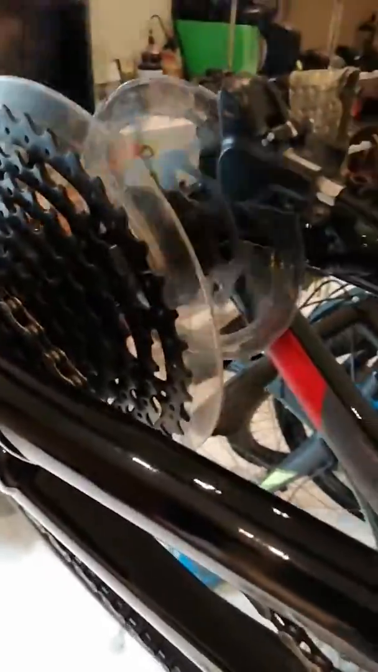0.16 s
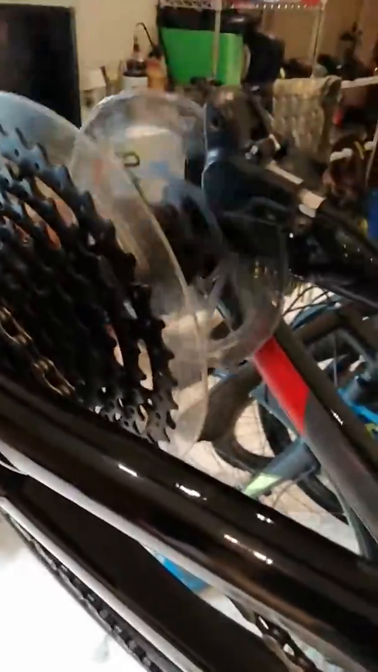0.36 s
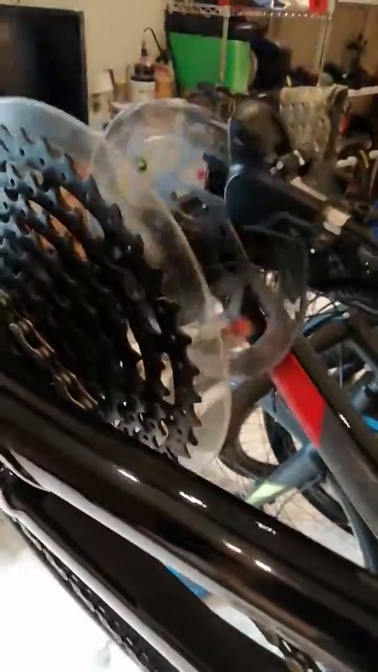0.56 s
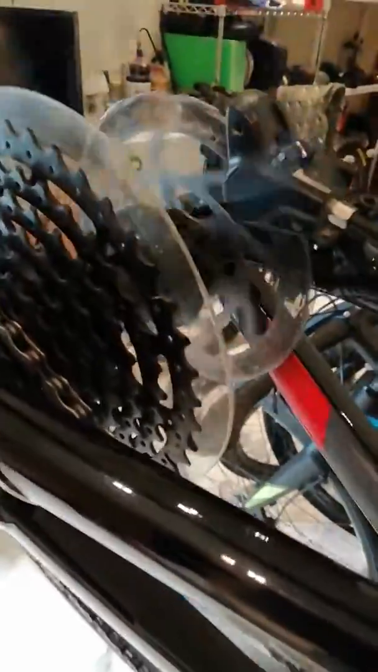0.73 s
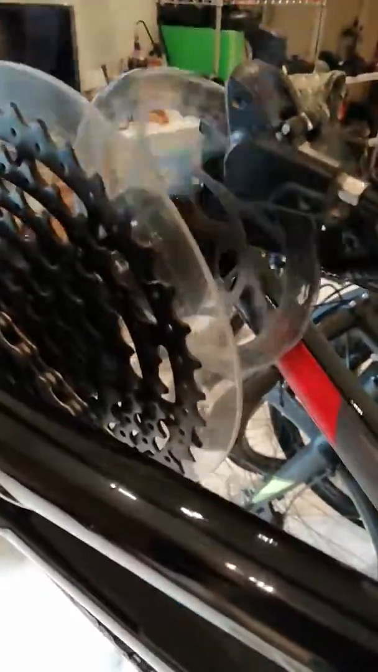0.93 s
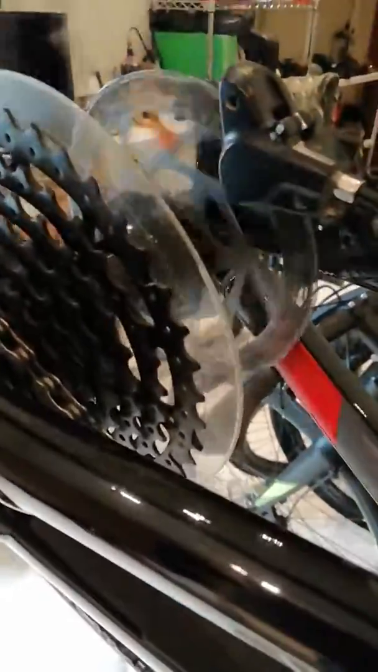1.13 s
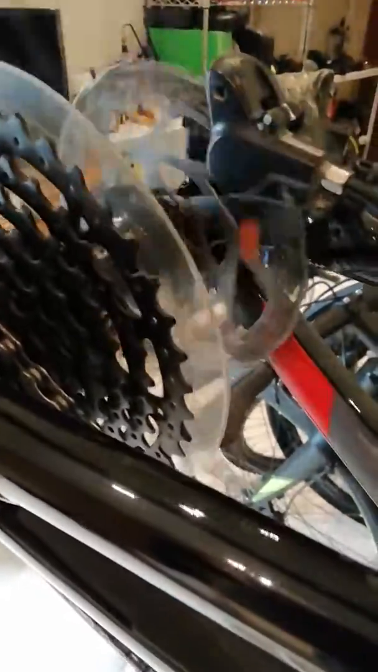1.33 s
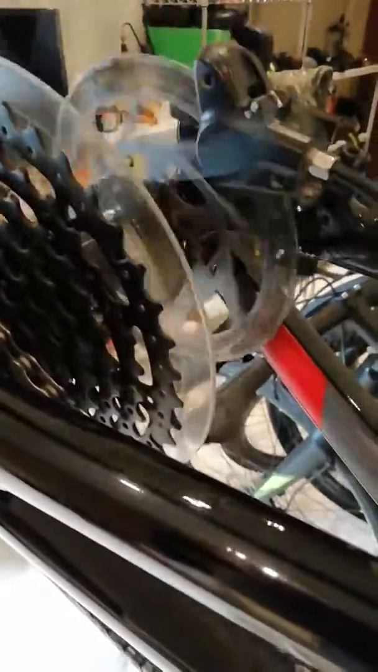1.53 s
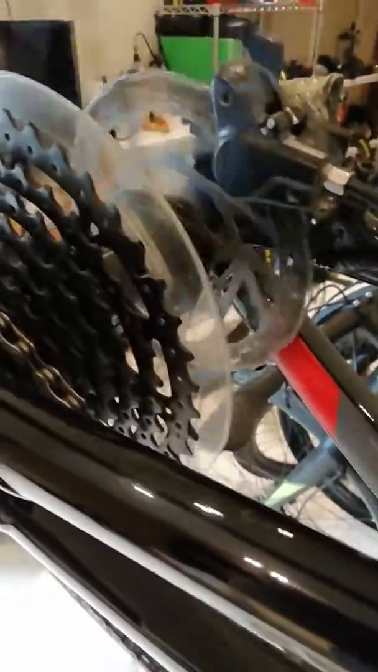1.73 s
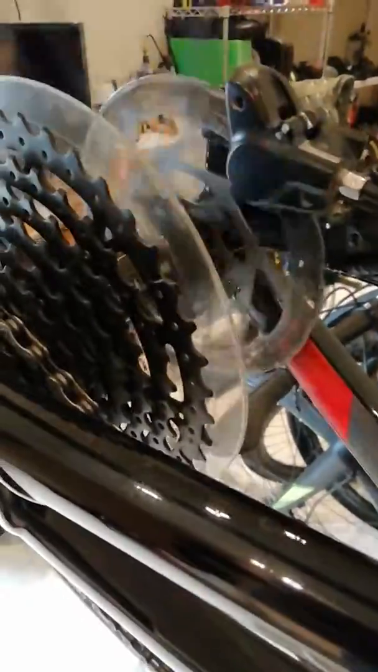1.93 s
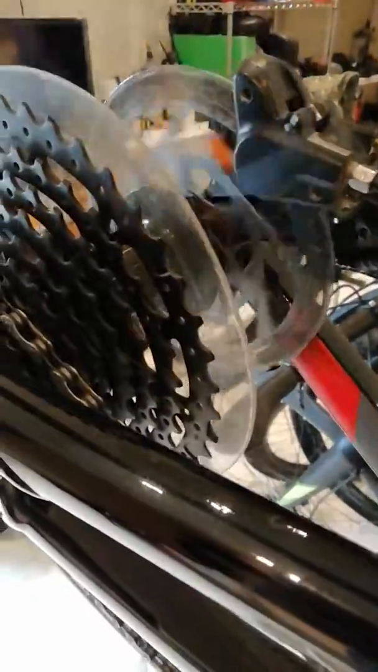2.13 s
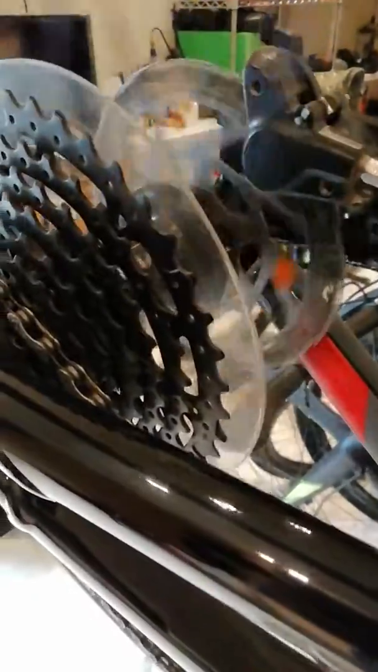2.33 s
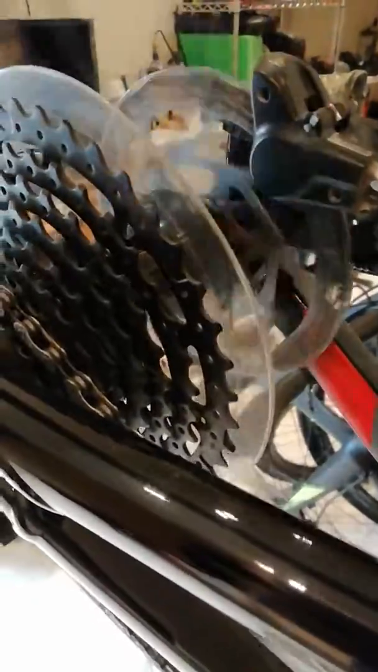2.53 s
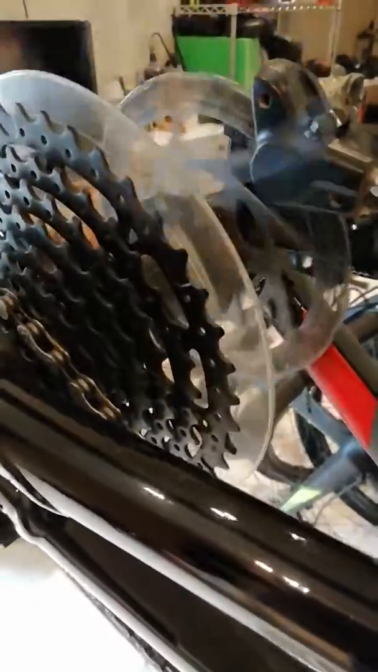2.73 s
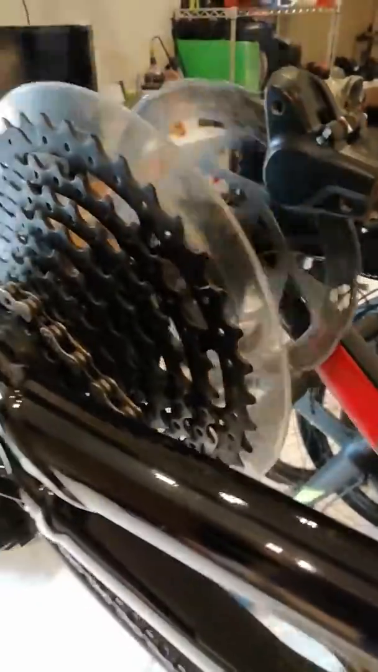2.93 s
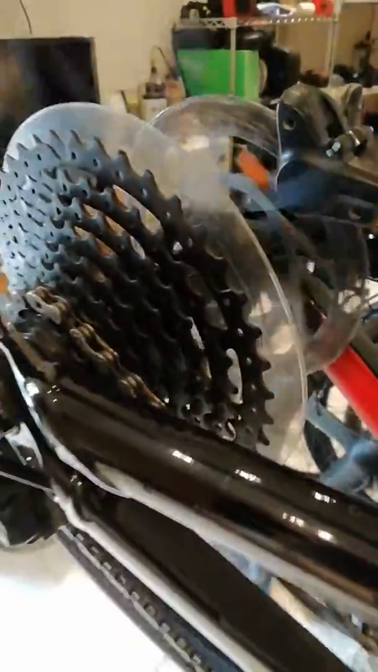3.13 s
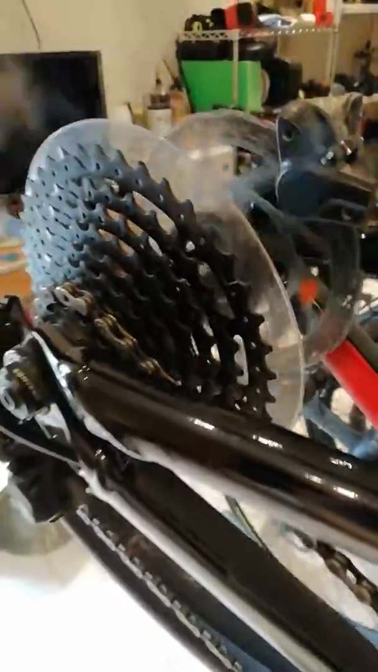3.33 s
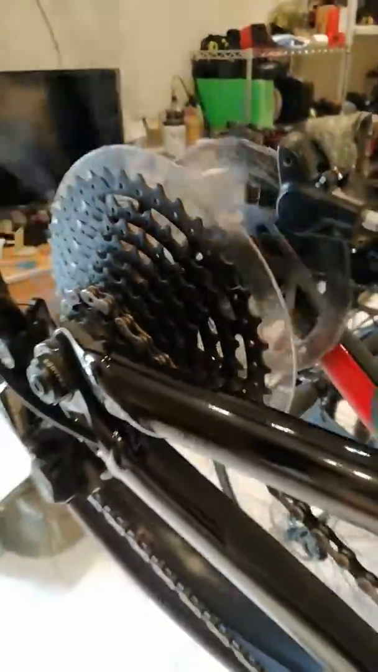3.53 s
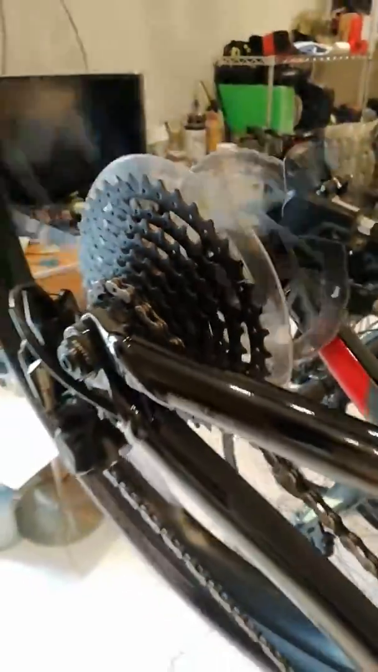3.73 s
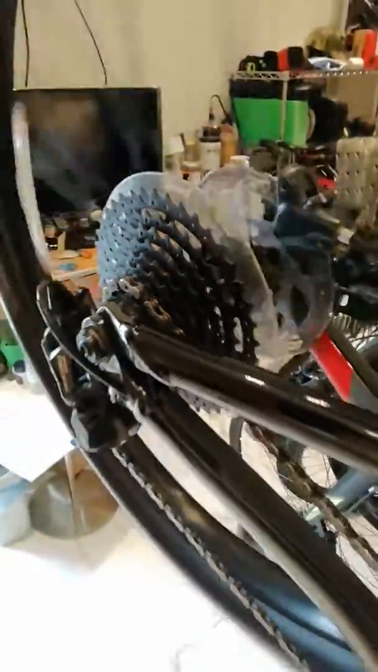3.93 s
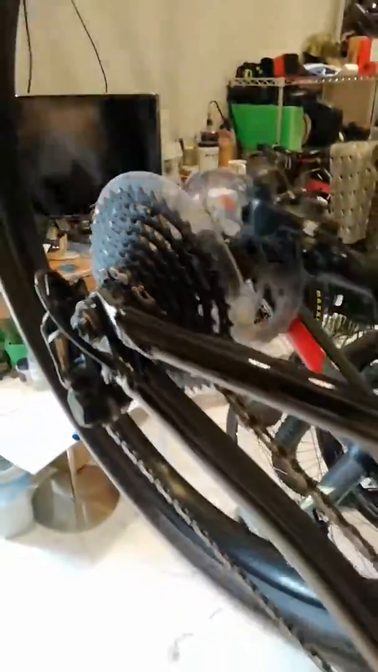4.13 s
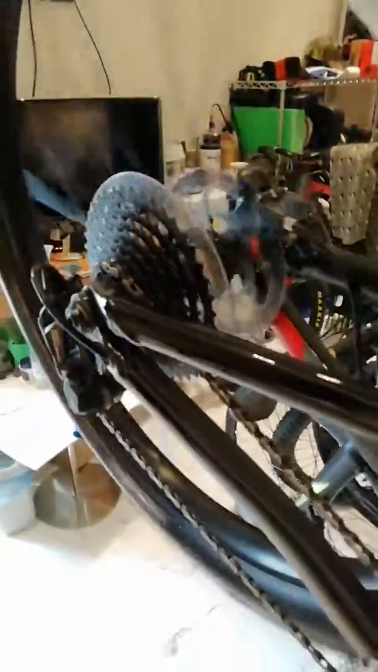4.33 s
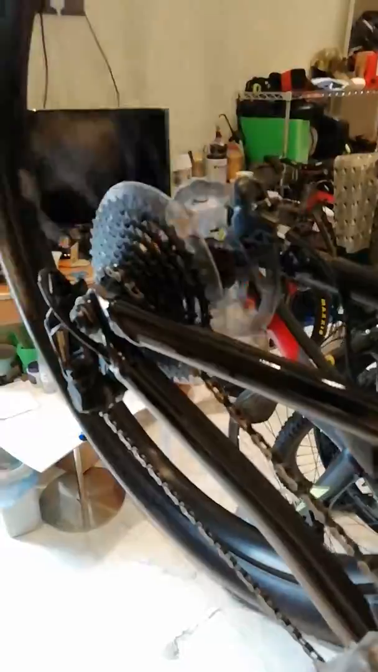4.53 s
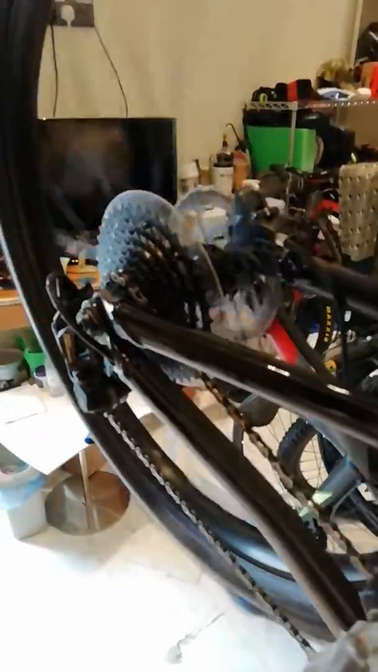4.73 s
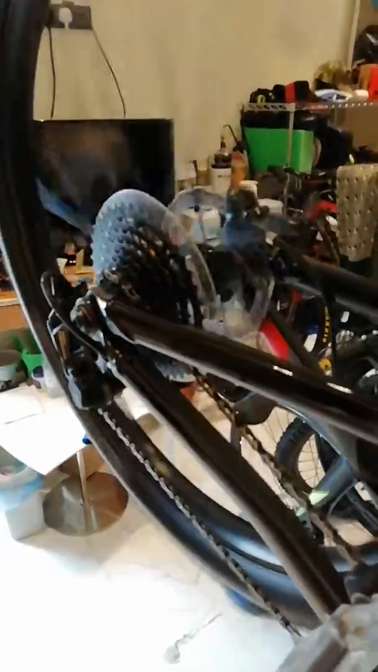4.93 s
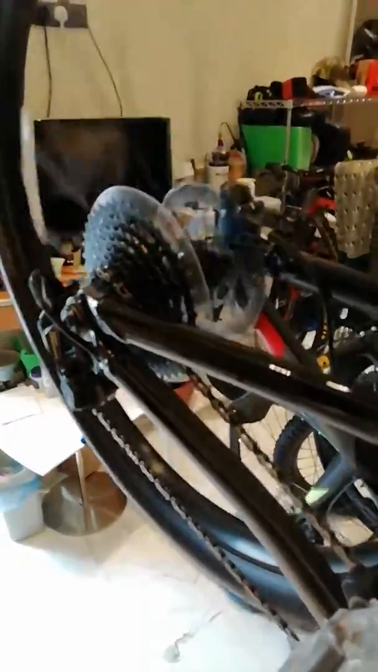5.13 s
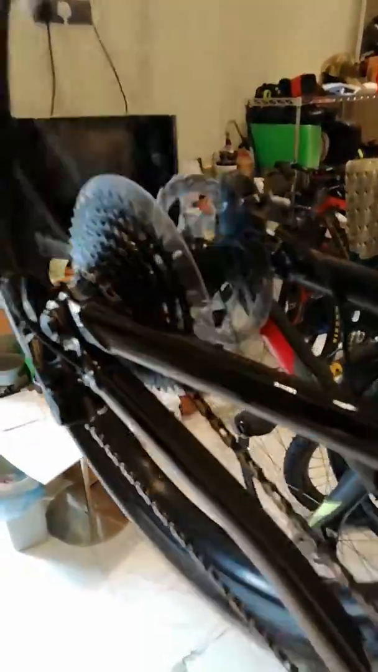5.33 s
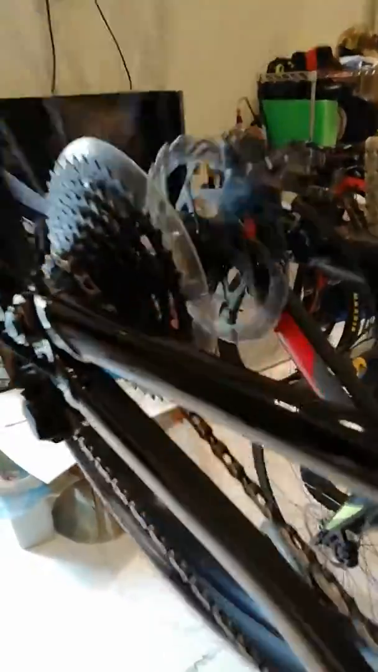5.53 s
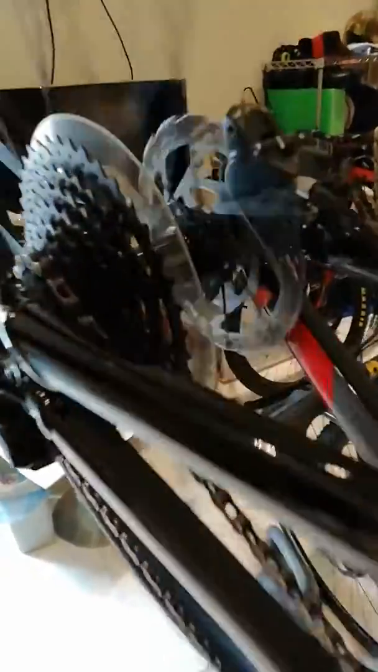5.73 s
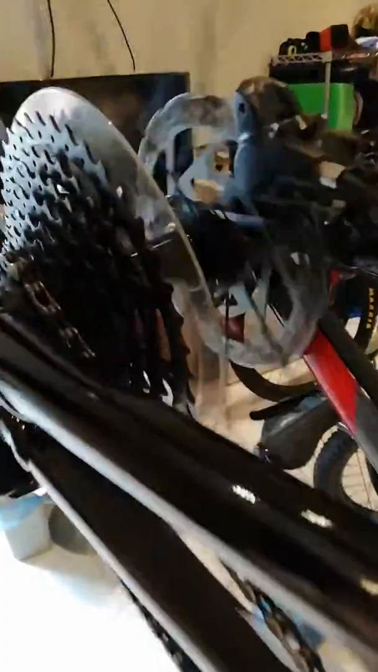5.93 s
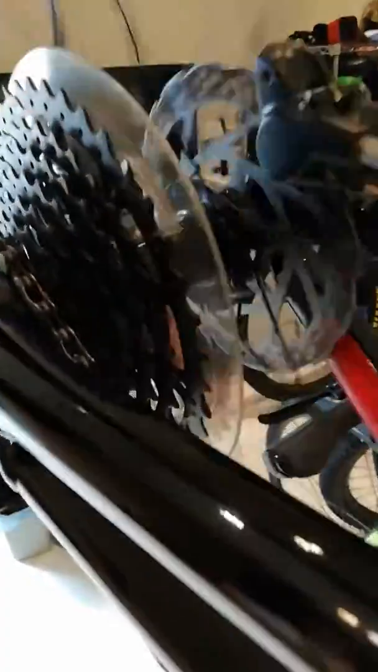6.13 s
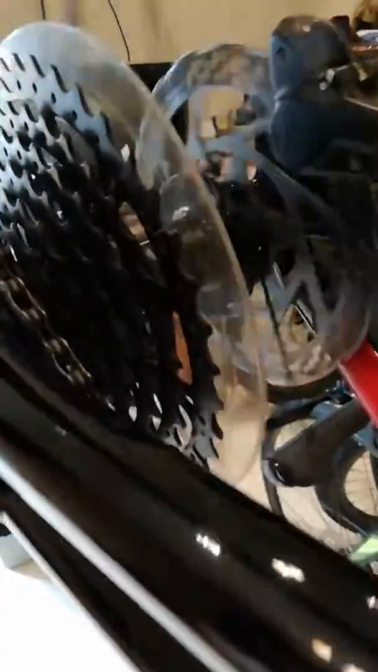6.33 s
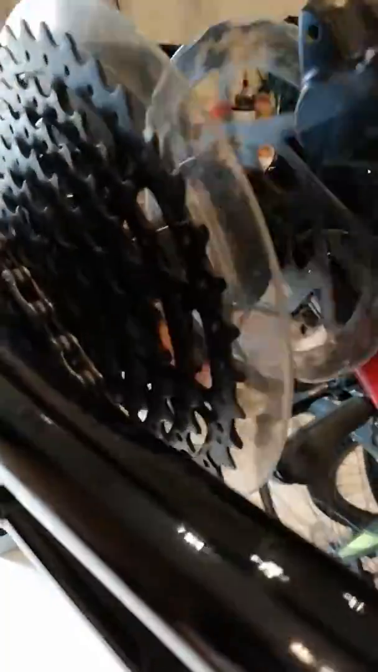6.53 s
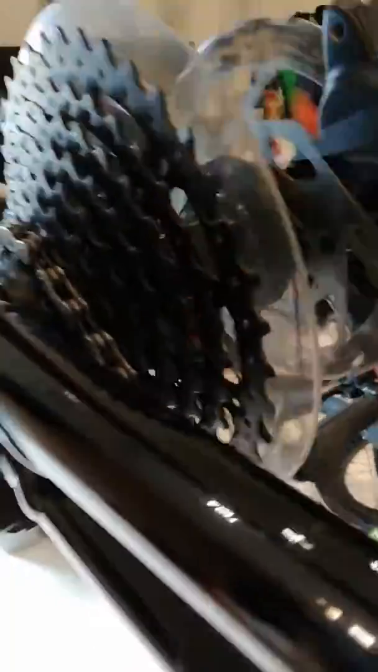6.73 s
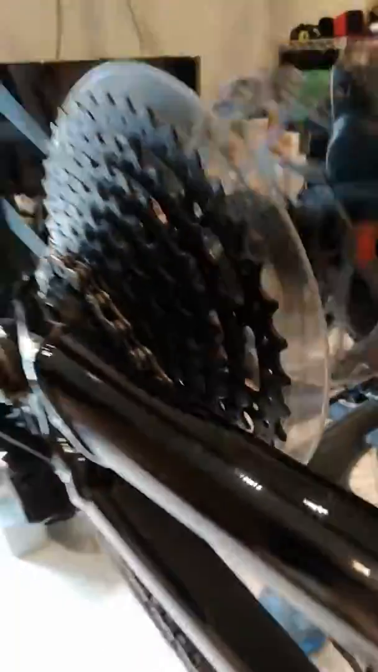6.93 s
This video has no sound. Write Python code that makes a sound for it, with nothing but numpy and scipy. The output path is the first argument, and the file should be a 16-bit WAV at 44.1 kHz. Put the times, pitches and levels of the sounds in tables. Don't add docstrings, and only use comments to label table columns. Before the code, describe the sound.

In a cluttered indoor room, a spinning rear wheel coasts with a dense, sharp ratchet rattle, hissy and metallic with little bass. The buzz pulses slightly unevenly, with an accented click about once per turn. Close stereo pickup shifts in tone and side as the microphone passes the sprockets, retreats to half a metre, then returns near. A few soft finger bumps come in the first second, and the click rate slowly falls.

```python
import sys
import numpy as np
from scipy import signal
from scipy.fft import rfft, irfft
from scipy.io import wavfile

SR = 44100
rng = np.random.default_rng(int(sys.argv[2]) if len(sys.argv) > 2 else 0)


def voltage_ratio(decibels):
    exponent = np.asarray(decibels, float) / 20
    return 10 ** exponent


def store_pcm(level_fs):
    pcm = np.round(np.clip(level_fs, -1, 1) * 32767).astype(np.int16)
    wavfile.write(sys.argv[1], SR, np.atleast_2d(pcm).T)


N = 307366


def rms_one(x):
    return x / np.sqrt(np.mean(x ** 2) + 1e-20)


def at_hz(points, hz):
    table_hz, values = np.transpose(points)
    return np.interp(np.log(hz), np.log(table_hz), values)


def train(times, sizes):
    at = np.round(times * SR).astype(int)
    inside = (at >= 0) & (at < N)
    return np.bincount(at[inside], sizes[inside], N) + 1e-18


def dying(energy, t60):
    return signal.lfilter([1], [1, -voltage_ratio(-120 / (t60 * SR))], energy)


def sides(db):
    return voltage_ratio(np.array([db / 2, -db / 2])).reshape(2, -1)


PART_HZ = [8500, 4500, 1600, 13500]


def across(levels, hz):
    share = [np.interp(np.log(hz), np.log(sorted(PART_HZ)), one) for one in np.eye(4)]
    return np.tensordot(share, levels, 1)


# (frequency [Hz], level [dB])
HUM = [(12, -33), (20, -14), (49, -3.5), (114, 4.5), (352, -4.5), (419, -2), (549, -8), (709, -4.5),
       (805, -4), (900, -2.5), (1170, -36), (1980, -120)]
# (frequency [Hz], side-mid [dB])
HUM_SIDE = [(40, -15), (100, -11), (160, -5), (300, 2), (900, 1)]
HUM_DB = -59


def room_tone():
    hz = np.maximum(np.fft.rfftfreq(N, 1 / SR), 1)
    mid, side = rfft(rng.standard_normal((2, N))) * voltage_ratio(at_hz(HUM, hz))
    mid, side = irfft([mid, side * voltage_ratio(at_hz(HUM_SIDE, hz))], N)
    return voltage_ratio(HUM_DB + 1.5) * np.array([mid + side, mid - side]) / np.std(mid)


RING_TEETH, START_S, START_TEETH_PER_S = 32, .0006, 38.8236
DRAG_TEETH = 798.028
FRICTION_TEETH_PER_S = 53.3163
UNBALANCE_TEETH_PER_S, FASTEST_TOOTH = 3.412, 8.02


def wheel():
    angle = np.arange(0, 213, .05)
    energy = (START_TEETH_PER_S ** 2 + FRICTION_TEETH_PER_S ** 2) * np.exp(-angle / DRAG_TEETH)
    energy = energy - FRICTION_TEETH_PER_S ** 2
    swing = np.cos(2 * np.pi * (angle - FASTEST_TOOTH) / RING_TEETH)
    speed = np.sqrt(energy + UNBALANCE_TEETH_PER_S ** 2 * swing)
    return angle, START_S + np.append(0, np.cumsum(np.diff(angle) / speed[1:]))


DROP_ANGLE = [(.022, .027, .027, .035), (.336, .346, .343, .345), (.457, .467, .464, .459)]
DROP_DB = [(1.6, 4.8, 2.1, 3.3), (3.2, 3.8, 5.3, 9.5), (3.5, 2.7, 7.1, 3.9)]
WORN_DB = [7.9, -5, 3.0]
WORN_TOOTH, WORN_LATE_TEETH = 9, .028
SWAY_DB, SWAY_TOOTH = 2.3, 17.3
WEAR_DB, WEAR_TEETH = 1.0, .003


def ring_of_teeth():
    tooth = np.arange(RING_TEETH)
    wear = rng.standard_normal((2, RING_TEETH, 3))
    angle = np.transpose(DROP_ANGLE)[tooth % 4] + WEAR_TEETH * wear[0]
    db = np.transpose(DROP_DB)[tooth % 4] + WEAR_DB * wear[1]
    sway = np.cos(2 * np.pi * (tooth - SWAY_TOOTH) / RING_TEETH)
    db[:, 1] += SWAY_DB * sway * np.array([1, -1, 0, 0])[tooth % 4]
    db[WORN_TOOTH] = WORN_DB
    angle[WORN_TOOTH, 1] += WORN_LATE_TEETH
    return angle, db


# (time [s], air puff level [dB])
WORN_DROPS = [
    (0.2316, -43),
    (1.0954, -55),
    (2.0168, -52),
    (3.005, -54),
    (4.0765, -56),
    (5.248, -63),
    (6.5496, -49),
]
CREEP = [.008, -.0047, -.0024]
PAWL_DB = [-1, 1, -2.5]
SPROCKET_DB = [2.5, 3.5, 0.1]
TOP_DB = [4.3, 3.4, -1.5]
HARD_RINGS, HARD_RINGS_TOP = 0.59, 0.66
SHARP_EDGE_DB, SLIP_DB = 1.5, 1.5


def drops():
    angle, s = wheel()
    tooth = np.arange(int(angle[-1]))
    on_ring = tooth % RING_TEETH
    drop_angle, db = [v[on_ring] for v in ring_of_teeth()]
    creep = np.outer(tooth / RING_TEETH, CREEP)
    times = np.interp(tooth[:, None] + drop_angle + creep, angle, s)
    times[on_ring == WORN_TOOTH, 0] = np.array(WORN_DROPS)[:, 0]
    place = on_ring[:, None] * 3 + np.arange(3)
    ring_db = db + PAWL_DB + rng.normal(0, .7, times.shape)
    low_db = ring_db - HARD_RINGS * db + SPROCKET_DB
    top_db = ring_db - HARD_RINGS_TOP * db + TOP_DB
    top_db = top_db + SHARP_EDGE_DB * rng.standard_normal(place.max() + 1)[place]
    top_db = top_db + SLIP_DB * rng.standard_normal(times.shape)
    bands_db = np.reshape([low_db / 3, low_db, ring_db, top_db], (4, -1))
    return times.ravel(), bands_db, place.ravel()


# (time [s], distance [m], sprocket face in sight [0-1], left-right [dB])
PATH = [(0, 0.24, .0, 6.5), (.5, 0.21, 0.03, 4), (1.5, 0.21, .0, 4), (2.5, .2, 0.12, 2.5),
        (3.28, 0.2, 1, 6), (3.84, .26, 0.97, -4), (4.4, 0.41, 0.26, 0.5), (4.96, 0.5, 0, -3),
        (5.24, 0.32, 0.44, 2), (5.52, 0.33, 0.13, -0.5), (5.8, 0.22, 0.45, -0.5), (6.08, 0.28, 0, -7.5),
        (6.36, 0.2, 0.43, 1), (6.64, 0.18, 0.7, 4.5), (6.97, 0.2, 0.84, 3.5)]
# (time [s], length [s], frequency [Hz], level [dB])
GLINTS = [(.5, 0.12, 1330, 8), (3.6, 0.6, 1700, 4.5), (3.56, 0.8, 7770, 5.5), (5.44, 0.2, 1870, 9),
          (5.704, 0.19, 3500, 3), (6.006, 0.11, 10200, 0.5), (3.52, 0.51, 1070, 5), (5.6, 0.15, 5400, 3),
          (6.6, 0.35, 4000, 3.5), (6.57, 0.43, 3230, -5), (5.73, .2, 1600, 2.5)]
FADES = [0.71, 1.16, 1.09, 1.3]
FACE_DB = [-2.5, 0, -4, -2.5]
NEAR_M, GLINT_OCTAVES = .2, 0.22
ROOM_NEAR_DB, ROOM_GROWS = -1.0, 1.13
LOW_PAN = -0.36


def view_db(hz):
    s, *path = np.transpose(PATH)
    clock = np.linspace(0, N / SR, 200)
    metres, face, side_db = [np.interp(clock, s, c) for c in path]
    loss_db = 20 * np.log10(metres / NEAR_M)
    here = across(np.outer(FACE_DB, face) - np.outer(FADES, loss_db), hz)
    for at, length, glint_hz, glint_db in GLINTS:
        off_pitch = np.log2(hz / glint_hz) / GLINT_OCTAVES
        here = here + glint_db * np.exp(-off_pitch ** 2 - ((clock - at) / length) ** 2)
    pan_db = across([LOW_PAN, LOW_PAN, 1, 1], hz) * side_db
    room_db = ROOM_NEAR_DB + ROOM_GROWS * loss_db
    curves = (here - here.mean(), pan_db - pan_db.mean(), room_db)
    return [np.interp(np.arange(N) / SR, clock, c) for c in curves]


# (time after the drop [s], level [dB])
BOUNCES = [
    (.0012, -1),
    (.0026, -13.5),
    (.0041, -14.5),
    (.007, -8.5),
]
SOFT_REBOUND_DB = [-1.0, -3.0, 0.0, -7.0]
# (frequency [Hz], t60 [s])
DYING = [(800, 0.058), (2000, 0.013), (4500, 0.013), (8500, 0.021), (14000, 0.012)]
# (frequency [Hz], level [dB])
ROOM_TINT = [(1000, 5), (3000, 0), (8500, -1), (14000, -6)]
# (frequency [Hz], level [dB])
CRACK = [(800, 20), (2500, 20.5), (4500, 9.5), (8500, 8.5), (14000, 17.5)]
# (frequency [Hz], level per Hz [dB])
COLOUR = [(560, -56), (950, -28), (1140, -8.5), (1280, -8.5), (1760, -9), (2670, -11), (3770, -8.5),
          (4200, -5.5), (4450, -0.5), (5580, -3), (6830, -5.5), (8560, 9.5), (11500, -28), (14300, 9),
          (16300, -47)]
# (frequency [Hz], left-right [dB])
SIDES = [(60, -0.5), (99, -0.5), (160, 0.5), (270, 1.0), (450, -2.0), (740, 6), (1220, 4.5), (2010, -12),
         (3330, -4.5), (5500, 2), (9080, 1.5), (15000, -3.5)]
SEATS = .7
SWELL_S = 0.00034
ROOM_T60_S, PORT_LAG_S, ALIKE = .25, .0001, .3


def rattle(times, bands_db, place):
    out, edges = np.zeros((2, N)), np.geomspace(850, 16300, 19)
    delay, drop_db = np.transpose([(0.001, 0.014)] + BOUNCES)
    rebounds = np.arange(len(delay)) > 0
    habit = rng.standard_normal((2, place.max() + 1, len(delay)))[:, place]
    at = (times[:, None] + delay * (1 + .12 * habit[0])).ravel()
    rebound_db = drop_db + (delay > 0) * 1.5 * habit[1]
    seated_db = SEATS * (bands_db[2] - bands_db[2].mean())[:, None]
    white, lag = rng.standard_normal((2, 3, N)), round(PORT_LAG_S * SR)
    for k, (low, high) in enumerate(zip(edges, edges[1:])):
        hz = np.sqrt(low * high)
        softer_db = (across(SOFT_REBOUND_DB, hz) - seated_db) * rebounds
        hit_db = across(bands_db, hz)[:, None] + rebound_db + softer_db
        tint_db = 1.0 * rng.standard_normal((2, place.max() + 1))[:, place, None]
        tint_db = tint_db + 2.0 * rng.standard_normal((2, *hit_db.shape))
        energy = np.array([train(at, voltage_ratio(2 * (hit_db + port_db)).ravel()) for port_db in tint_db])

        level_db, pan_db, room_db = view_db(hz)
        swell = dying(energy, SWELL_S * np.log(1e6))
        near = dying(swell, at_hz(DYING, hz)) * 2 / (SWELL_S * SR)
        far = dying(energy.mean(axis=0), ROOM_T60_S)
        room_gain = voltage_ratio(2 * (room_db + at_hz(ROOM_TINT, hz)))
        envelope = np.sqrt(near + room_gain * far * near.mean() / far.mean())

        shared, left, right = white[k % 2]
        common = np.array([np.roll(shared, lag), shared])
        noise = np.sqrt(ALIKE) * common + np.sqrt(1 - ALIKE) * np.array([left, right])
        click = voltage_ratio(at_hz(CRACK, hz)) * np.sqrt(energy) * rng.choice([-1, 1], (2, 1))
        sos = signal.butter(2, [low, high], "band", fs=SR, output="sos")
        band = rms_one(signal.sosfilt(sos, envelope * noise + click)) * np.sqrt(high - low)
        out += band * voltage_ratio(at_hz(COLOUR, hz) + level_db) * sides(at_hz(SIDES, hz) + pan_db)
    return voltage_ratio(-22.5) * rms_one(out)


# (frequency [Hz], t60 [s], left-right [dB], level
# at the three stands [dB] x 3)
MODES = [(414, .4, -4, -29.5, -22.5, -49), (720.5, .2, 0, -39, -38, -35), (898, .1, -2, -38, -30.5, -52),
         (1103, 0.064, -3, -26, -29, -26.5), (1157.8, .15, 1, -25, -18, -30.5),
         (1213, .25, -7, -44, -24, -31), (1361, .12, -11.5, -40.5, -21, -38.5),
         (1561, .12, -11, -31.5, -32, -36.5), (1762, .07, -10.5, -31, -26.5, -28.5),
         (2056, .06, -7, -30, -44, -33.5), (2282, .08, 2.5, -33, -26.5, -36),
         (3404, .05, -30.5, -41.5, -42.5, -57.5), (3798, 0.019, -12, -26.5, -33.5, -22.5),
             (4000, .05, -10, -31.5, -57, -26), (4530, 0.042, -3, -23.5, -40, -17),
             (4876, .1, 10.5, -25, -21.5, -33), (5306, .11, -5, -28, -17, -32.5),
             (5400, .07, -5, -32, -19.5, -31), (5870, 0.1, -2, -28.5, -27, -27.5),
             (6490, 0.047, -1, -22, -55, -22.5),
         (8147, 0.0082, 5.5, -12.5, -12, -11), (8705, 0.027, 6.5, -12.5, -9.5, -16),
         (8970, 0.0066, -7, -18.5, -22, -12), (10570, 0.0051, -14.5, -23.5, -51, -28.5),
         (13900, 0.0025, -10, -27, -45, -23.5)]
STANDS_S = [3.25, 4.79, 6]


def ringing(times, bands_db):
    out = np.zeros((2, N))
    for hz, t60, side_db, *stand_db in MODES:
        strength = voltage_ratio(across(bands_db, hz) + 1.2 * rng.standard_normal(len(times)))
        blows = train(times, strength * rng.choice([-1, 1], len(times)))
        t60 = min(t60, max(.08, 90 / hz) if hz < 7500 else .01)
        r, w = voltage_ratio(-60 / (t60 * SR)), 2 * np.pi * hz / SR
        wave = signal.lfilter([0, 1], [1, -2 * r * np.cos(w), r * r], blows)
        sos = signal.butter(1, [hz / 1.15, hz * 1.15], "band", fs=SR, output="sos")
        wave = rms_one(signal.sosfilt(sos, wave))
        level_db = view_db(hz)[0] + np.interp(np.arange(N) / SR, STANDS_S, stand_db) - 16.5
        for port, late in enumerate([round(SR / hz / 4), 0]):
            out[port] += np.roll(wave, late) * voltage_ratio(level_db) * sides(side_db)[port]
    return out


# (time [s], peak level [dB])
BUMPS = [
    (0.078, -39),
    (0.619, -56),
    (0.819, -46),
]
DROP_PUSH_DB = -61


def puffs(times, strength_db, rise_s=.0018):
    t = np.arange(SR // 10) / SR
    worn, bumps = np.array(WORN_DROPS), np.array(BUMPS)
    pushes = train(worn[:, 0], voltage_ratio(worn[:, 1] + 13)) + train(times, voltage_ratio(strength_db + DROP_PUSH_DB))
    shifts = train(bumps[:, 0], voltage_ratio(bumps[:, 1] + 2))
    hard = np.convolve(pushes, t / rise_s * np.exp(1 - t / rise_s))[:N]
    soft = np.convolve(shifts, t / 0.0067 * np.exp(1 - t / 0.0041))[:N]
    sos = signal.butter(1, 25, "high", fs=SR, output="sos")
    return -signal.sosfilt(sos, hard + soft) * sides(-2.2)


def scene():
    times, bands_db, place = drops()
    hub = rattle(times, bands_db, place) + ringing(times, bands_db)
    thin = signal.sosfilt(signal.butter(4, 950, "high", fs=SR, output="sos"), hub)
    return thin + voltage_ratio(-20.5) * hub + puffs(times, bands_db[2]) + room_tone()


def band_limit(x):
    return signal.sosfilt(signal.butter(12, 16420, fs=SR, output="sos"), x)


def record(dry):
    cut = signal.sosfilt(signal.cheby2(12, 40, 16300, fs=SR, output="sos"), dry)
    mix = np.clip(2 * np.tanh(cut / 2), -1, 1)
    return band_limit(mix)


dry = scene()
out = record(dry)
store_pcm(out)
```